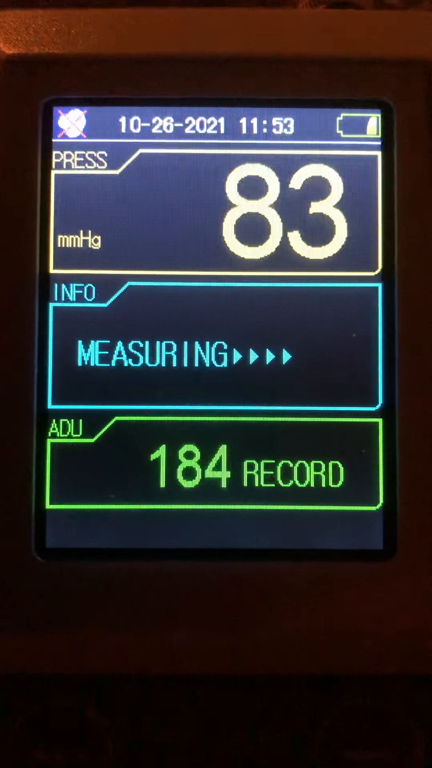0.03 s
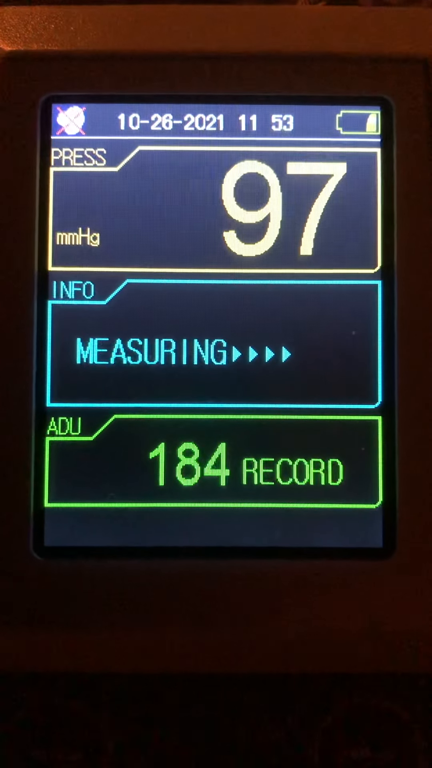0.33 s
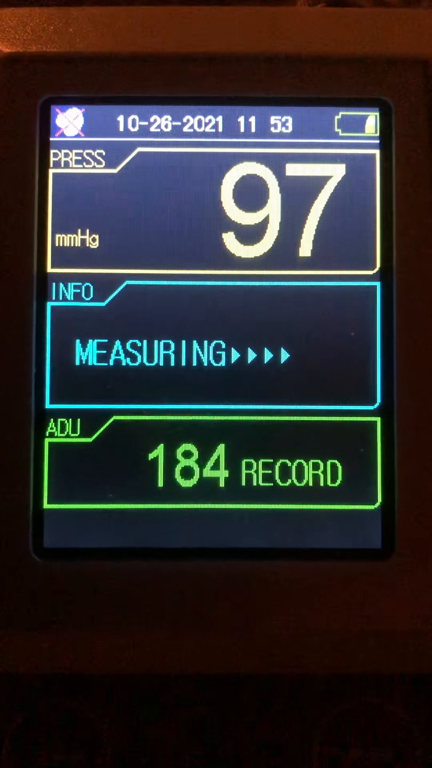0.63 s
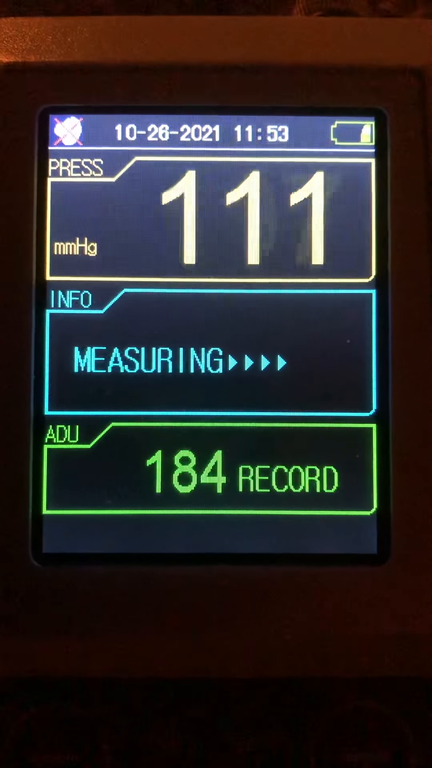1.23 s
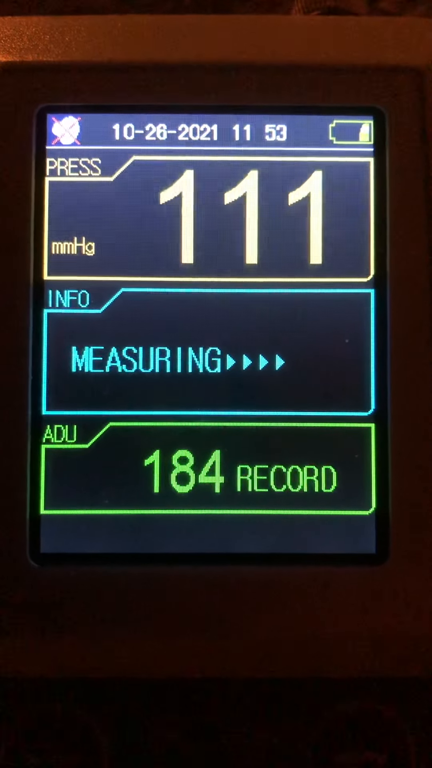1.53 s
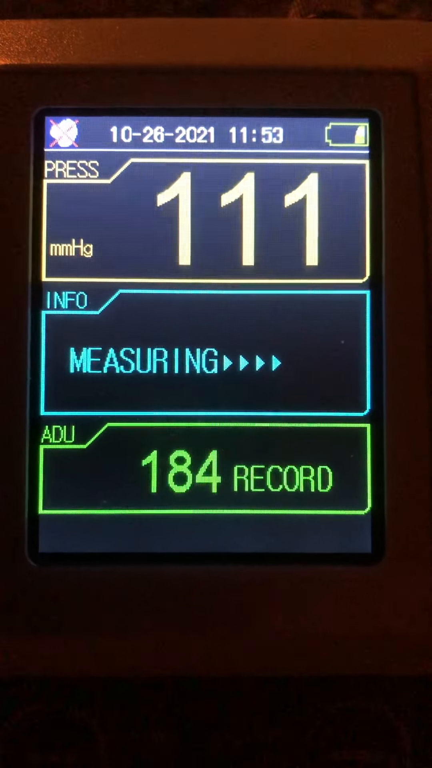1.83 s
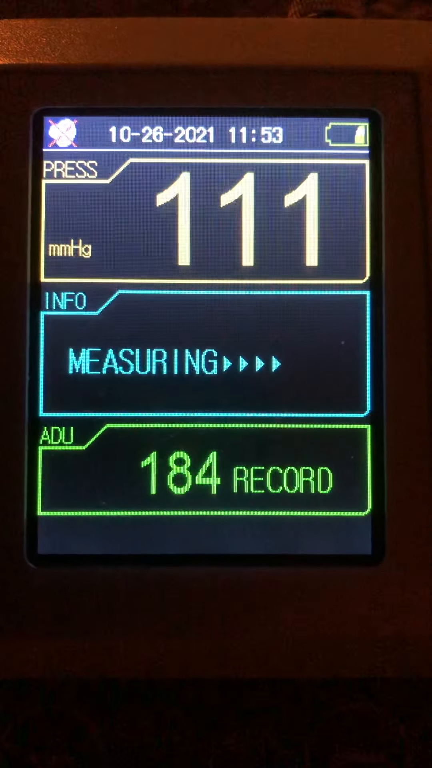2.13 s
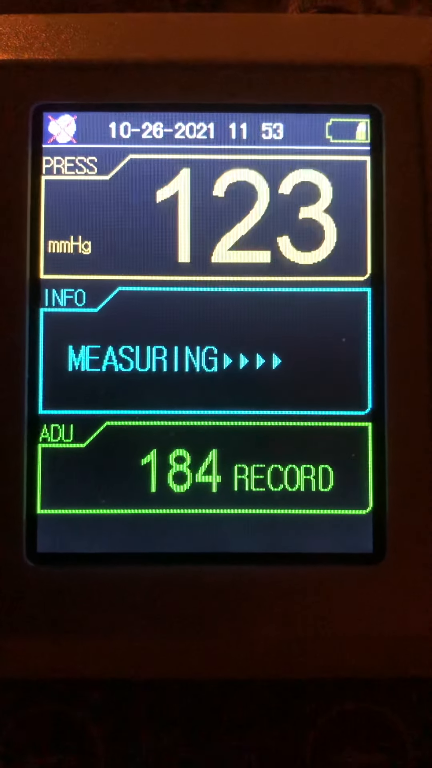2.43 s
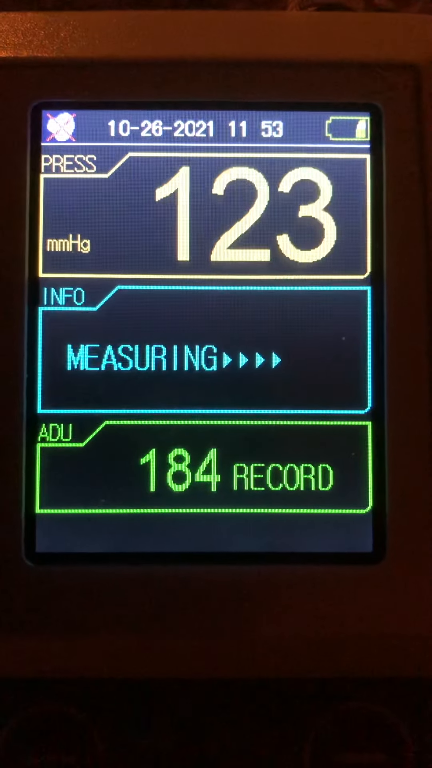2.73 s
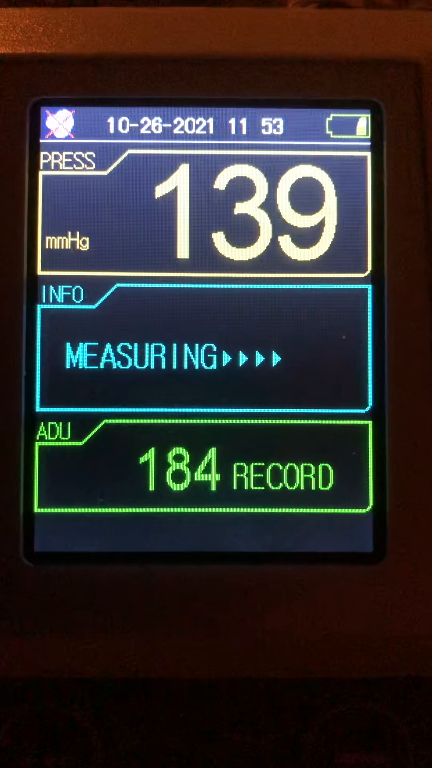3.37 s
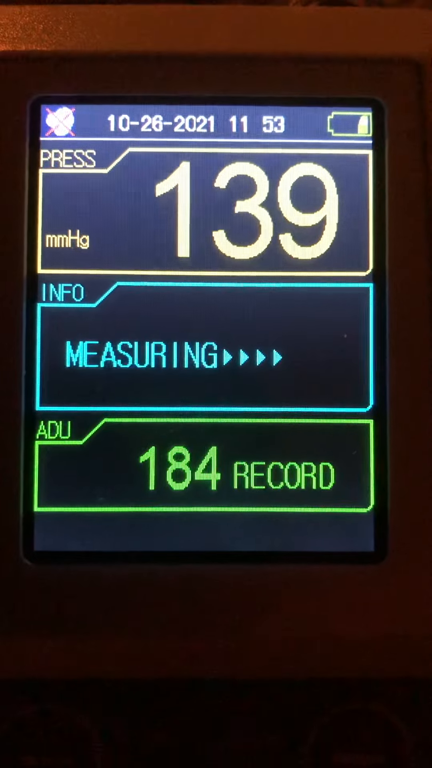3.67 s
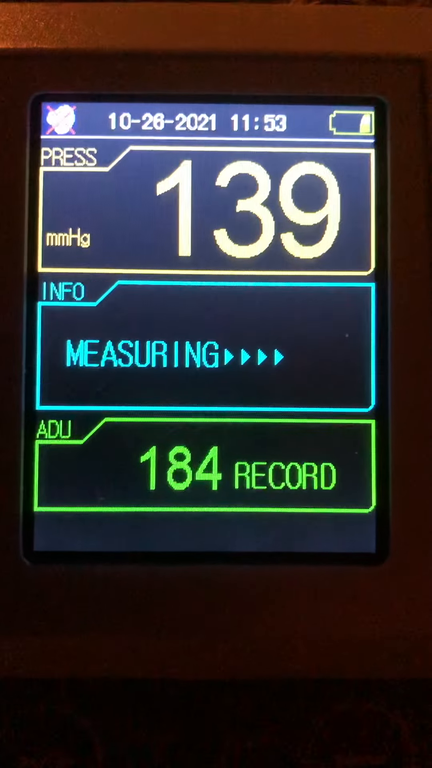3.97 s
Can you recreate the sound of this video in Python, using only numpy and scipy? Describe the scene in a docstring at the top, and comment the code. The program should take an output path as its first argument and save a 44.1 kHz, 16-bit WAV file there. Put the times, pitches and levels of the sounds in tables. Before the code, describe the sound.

A blood pressure monitor's pump buzzes close to the microphone in a quiet room, its pitch sinking slightly as the cuff fills. The cuff rustles faintly twice, and its hook-and-loop fastener crackles softly, more often toward the end.

```python
"""A close, buzzing drone sinks slowly in pitch: a blood pressure monitor's diaphragm pump fills a cuff.
Each motor turn knocks the plastic case once, and the knocks fuse into a tone coloured by its resonances.
Valves tick, the brushes whirr, and the speed sags as pressure builds. The tightening cuff's
hook-and-loop fastener crackles faintly; appliances hum in the quiet room."""
import sys
import numpy as np
from scipy import signal
from scipy.fft import rfft, irfft
from scipy.io import wavfile
from scipy.ndimage import map_coordinates

SR = 44100
rng = np.random.default_rng(int(sys.argv[2]) if len(sys.argv) > 2 else 0)


def output_pcm(signal):
    """Save a mono or channel-first signal as 16-bit PCM at the path in sys.argv[1].

    Samples are clipped to [-1, 1] before scaling.
    """
    pcm = np.clip(np.atleast_2d(signal).T, -1, 1) * 32767
    wavfile.write(sys.argv[1], SR, np.round(pcm).astype(np.int16))


N = 176400
TIME = np.arange(N) / SR
FFT_SIZE = 16384
BINS = np.fft.rfftfreq(FFT_SIZE, 1 / SR)

# The motor slows under load. Each row: time in seconds, speed in turns per second.
MOTOR_SPEED = [(0.0, 47.71), (0.4, 47.573), (0.7, 47.422), (0.87, 47.153), (1.05, 47.164), (1.35, 46.776),
               (1.7, 46.266), (1.9, 46.443), (2.2, 46.173), (2.5, 45.813), (2.9, 45.625), (3.3, 45.498),
               (3.65, 45.234), (4.0, 45.127)]
# Bright spectrum of a snapping hook. Each row: frequency in Hz, relative gain in dB.
SNAP_SPECTRUM = [(2000, -36), (8000, -12), (10500, -5), (12300, 0), (13600, -6), (16000, -8)]


def case_knocks(turns):
    """Impulse excitation: one stroke per turn rings the case, whose colour shifts as the cuff tightens."""
    # Broad spectrum of a knock. Each row: frequency in Hz, relative gain in dB.
    knock_spectrum = [(25.0, -14), (46.0, -2), (92.0, -34), (138.0, 6), (185.0, -12.5), (235.0, -4.5),
                      (380.0, -18), (460.0, -5), (640.0, -1.5), (825.0, 6.5), (900.0, -1.5), (1095.0, -6.5),
                      (1135.0, -41.5), (1205, -9.5), (1500, -8.5), (1930, -18.5), (2090, 1), (2230, -1.5),
                      (2380, -10.5), (2750, -13.5), (3200, -26.5), (6200, -44), (16000, -59)]
    # Resonances and dips of case and surroundings. Each row: centre in Hz, width in Hz, gain in dB.
    resonances = [(289.5, 28.7, 17.6), (404.6, 8.0, 4.7), (472.7, 31.5, 10.7), (594.7, 29.7, 6.4),
                  (672.7, 20.6, 6.1), (698.9, 14.8, -6.3), (756, 42, 6.6), (890.8, 20.7, -11.7),
                  (911.9, 19.9, 5.7)]
    # The case flexes later at low pitch. Each row: frequency in Hz, delay in milliseconds.
    flex_delay = [(150, 0.034), (450, 1.88), (800, 1.45), (1300, 0.12), (2200, 0.42), (3500, 0.033)]
    # Change from slack cuff to tight cuff. Each row: frequency in Hz, gain in dB.
    tightening = [(140.0, -0.5), (280.0, -2.5), (350.0, 5), (680.0, 0), (722.0, -5.5), (765.0, -3.5),
                  (1300.0, 4.5), (2200, 1.5)]
    blows = strokes(turns)
    case_db = curve(knock_spectrum) + sum(peak(hz, width, db) for hz, width, db in resonances)
    lag_s = curve(flex_delay) / 1000
    slack = colour(blows, case_db, lag_s)
    tight = colour(blows, case_db + curve(tightening), lag_s)
    tightness = TIME / TIME[-1]
    return amp(-46) * unit((1 - tightness) * slack + tightness * tight)


def nasal_swell(drone, at_s=2.26, half_s=0.42):
    """Formant emphasis: the drone's main ring swells slightly, midway through the inflation."""
    swell = np.exp(-((TIME - at_s) / half_s) ** 2)
    boosted = colour(drone, peak(hz=850, width_hz=75, db=1.5))
    return (1 - swell) * drone + swell * boosted


def valves(turns, lead_turns=.02, tick_hz=4858, tick_width_hz=2280):
    """Impact and free decay: the outlet valve ticks just before each knock; softer flaps follow."""
    # Strength of the outlet tick. Each row: time in seconds, rms level in dB.
    tick_levels = [(0, -67), (0.6, -63.5), (1.3, -67), (1.6, -63.5), (1.85, -64), (2.1, -67.5),
                   (2.55, -62.5), (3.05, -66.5), (3.7, -61.5)]
    # Flaps of the other chambers. Each row: delay in turns, centre in Hz, width in Hz, rms level in dB.
    chamber_flaps = [(0.24, 2500, 305, -67), (.3, 1515, 240, -74.5), (.76, 1234, 290, -70.5),
                     (.2, 2890, 180, -70.5)]
    closures = strokes(turns + lead_turns, uneven_db=1.1)
    tick = ring(ring(closures, tick_hz, tick_width_hz), tick_hz, tick_width_hz)
    ping = amp(-12) * ring(closures, hz=4896, width_hz=330)
    flaps = sum(amp(db) * ring(strokes(turns - delay), hz, width)
                for delay, hz, width, db in chamber_flaps)
    return amp(over_time(tick_levels)) * unit(tick + ping) + flaps


def brush_whirr(turns, track_points=900, random_share=.08, bursts_per_turn=6):
    """Periodic friction: brushes scrape the same rough track every turn, in one burst per commutation."""
    # Brush and bearing noise. Each row: frequency in Hz, relative gain in dB.
    whirr_spectrum = [(300, -1.5), (900, 7.5), (1800, 10.5), (2400, 7), (2900, 11.5), (3200, 1.5),
                      (4000, -5), (4900, 5), (6300, -12), (7450, 4.5), (7900, -6), (8800, 5), (9500, -8.5),
                      (11000, 5), (12000, -2), (14200, -8), (15800, -2)]
    roughness = rng.standard_normal(track_points)
    track = map_coordinates(roughness, [turns % 1 * track_points], mode="grid-wrap")
    scrape = np.sqrt(1 - random_share) * track + np.sqrt(random_share) * rng.standard_normal(N)
    bursts = 1 + 0.39 * np.cos(2 * np.pi * bursts_per_turn * turns)
    return amp(-58) * unit(colour(scrape * bursts, curve(whirr_spectrum)))


def hook_snaps(snap_s=0.00059, tail_s=0.0031):
    """Elastic release: each strained hook lets go in a bright puff with a duller body and a short tail."""
    # Each row: start in seconds, level in dB, body's relative level in dB (both before filtering).
    snaps = [(0.7324, -56, -15), (0.784, -53, -21), (1.56, -50.5, -17), (1.572, -54, -23),
             (1.612, -50.5, -26), (1.63, -57, -21), (1.645, -58.5, -10.5), (2.3477, -56, -18),
             (2.4755, -56, -12), (2.569, -63, -7), (2.821, -53.5, -10.5), (3.137, -52, -25),
             (3.146, -58, -14), (3.212, -58, -16), (3.3033, -50.5, -20), (3.321, -53, -16),
             (3.3886, -51, -12.5), (3.505, -58, -14), (3.5937, -55, -15), (3.6962, -49, -23),
             (3.763, -48, -26), (3.822, -57.5, -21.5), (3.858, -56, -17), (3.9434, -55, -19)]
    # Duller part of a snap. Each row: frequency in Hz, relative gain in dB.
    body_spectrum = [(1000, -24), (3500, -8), (4800, 0), (6200, -4), (7500, -1), (14000, -15)]
    bright, body = np.zeros(N), np.zeros(N)
    t = TIME[:SR // 10]
    release = np.e * (t / snap_s) ** 2 * np.exp(-(t / snap_s) ** 2)
    envelope = release + amp(2.5) * np.exp(-t / tail_s)
    for start_s, db, body_db in snaps:
        at = round(start_s * SR)
        puff = (amp(db) * envelope * rng.choice([-1, 1], len(t)))[:N - at]
        bright[at:at + len(puff)] += puff
        body[at:at + len(puff)] += amp(body_db) * puff
    return colour(bright, curve(SNAP_SPECTRUM) + 7) + colour(body, curve(body_spectrum) + 21)


def cuff_rustle():
    """Shot noise: fabric ticks merge into rustles, and small hooks crackle once the cuff is tight."""
    # The cuff shifts. Each row: centre in seconds, half length in seconds, level in dB.
    shifts = [(0.785, 0.045, -60), (1.615, 0.06, -62.5)]
    # Colour of the fabric. Each row: frequency in Hz, relative gain in dB.
    fabric_spectrum = [(1500, -8), (2700, 4), (3600, -3), (5000, 5), (6200, -6), (7700, 1), (15000, -7)]
    # Fine crackle of strained hooks. Each row: time in seconds, rms level in dB.
    strain_levels = [(2.9, -84), (3.25, -72), (3.75, -68), (4, -72)]
    swell = sum(amp(db) * np.exp(-((TIME - at_s) / half_s) ** 2) for at_s, half_s, db in shifts)
    fabric = unit(colour(grains(per_s=1000), curve(fabric_spectrum)))
    hooks = unit(colour(grains(per_s=300), curve(SNAP_SPECTRUM)))
    return swell * fabric + amp(over_time(strain_levels)) * hooks


def reverberation(x, t60_s=0.37, gap_s=.003):
    """Diffuse reflection: the room answers with a short, exponentially decaying tail."""
    # Colour of the reflections. Each row: frequency in Hz, gain in dB.
    room_spectrum = [(300, -36.5), (750, -10), (2200, -17.5), (3000, -8.5), (5000, -18)]
    t = TIME[:SR // 2]
    tail = rng.standard_normal(len(t)) * np.exp(-np.log(1000) * t / t60_s) * (t > gap_s)
    reflections = signal.fftconvolve(x, tail / np.linalg.norm(tail))[:N]
    return colour(reflections, curve(room_spectrum))


def background():
    """Superposition: steady appliance tones lie over the soft broadband noise of room air."""
    # Appliance hum. Each row: frequency in Hz, rms level in dB.
    hum_tones = [(84.4, -72), (112.6, -69.5), (120, -61.5), (148.2, -66.5), (240, -73.5)]
    # Room air. Each row: frequency in Hz, relative gain in dB.
    air_spectrum = [(20, -33), (30, 5), (70, 7.5), (150, 8), (800, 1), (1600, -7), (3500, -19),
                    (8000, -10.5), (16000, -28.5)]
    hum = sum(amp(db) * np.sqrt(2) * np.sin(2 * np.pi * (hz * TIME + rng.random()))
              for hz, db in hum_tones)
    air = amp(-62.5) * unit(colour(rng.standard_normal(N), curve(air_spectrum)))
    return hum + air


def strokes(turns, uneven_db=.2):
    """Band-limited pulse train: one slightly uneven impulse per turn."""
    samples_off = (turns - np.round(turns)) * SR / over_time(MOTOR_SPEED)
    pulses = np.sinc(samples_off) * np.exp(-(samples_off / 10) ** 2)
    return pulses * amp(uneven_db * drift())


def grains(per_s):
    """Poisson process: tiny random ticks, scaled to rms 1."""
    return unit(rng.standard_normal(N) * (rng.random(N) < per_s / SR))


def drift(bandwidth_hz=30.7):
    """Low-pass noise: a random wander of rms 1."""
    low_pass = np.exp(-(np.fft.rfftfreq(N, 1 / SR) / bandwidth_hz) ** 2)
    return unit(irfft(rfft(rng.standard_normal(N)) * low_pass, N))


def ring(x, hz, width_hz):
    """Damped resonance with steep skirts, scaled to rms 1."""
    detuning = (BINS ** 2 - hz ** 2) / ((BINS + 20) * width_hz)
    return unit(colour(x, -30 * np.log10(1 + detuning ** 2)))


def peak(hz, width_hz, db):
    """Lorentzian peak or dip, in dB at each frequency bin."""
    return db / (1 + (2 * (BINS - hz) / width_hz) ** 2)


def colour(x, db, lag_s=0):
    """Minimum-phase filtering, with an extra group delay at each frequency."""
    log_gain = np.log(amp(db))
    phase = -signal.hilbert(np.r_[log_gain, log_gain[-2:0:-1]]).imag[:len(BINS)]
    phase -= 2 * np.pi * np.cumsum(lag_s * np.ones(len(BINS))) * BINS[1]
    response = irfft(np.exp(log_gain + 1j * phase))[:FFT_SIZE // 2]
    return signal.fftconvolve(x, response)[:N]


def curve(points):
    """Interpolates a table on a log-frequency axis."""
    hz, value = np.transpose(points)
    return np.interp(np.log(BINS + 1), np.log(hz), value)


def over_time(points):
    """Interpolates a table on the time axis."""
    return np.interp(TIME, *np.transpose(points))


def amp(db):
    """Decibels to gain."""
    return 10 ** (np.asarray(db) / 20)


def unit(x):
    """Scales to rms 1."""
    return x / np.sqrt(np.mean(x ** 2) + 1e-20)


def scene():
    """Phase locking: one shaft angle times knocks, valves and brushes; cuff and room add to them."""
    start_turn, wobble_turns = -.04, 0.00043
    turns = start_turn + np.cumsum(over_time(MOTOR_SPEED)) / SR + wobble_turns * drift()
    pump = nasal_swell(case_knocks(turns)) + valves(turns) + brush_whirr(turns)
    direct = pump + hook_snaps() + cuff_rustle()
    return (direct + reverberation(direct) + background())[None]


def record(dry, cutoff_hz=15800):
    """Band limiting: a linear-phase low-pass removes the highest treble."""
    low_pass = signal.firwin(511, cutoff_hz, window=("kaiser", 9), fs=SR)
    return signal.oaconvolve(dry, low_pass[None], "same")


dry = scene()
out = record(dry)
output_pcm(out)
```